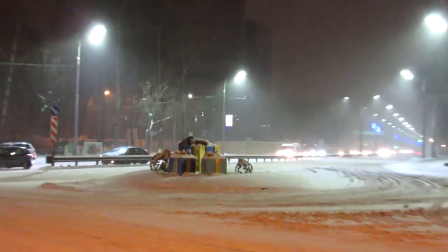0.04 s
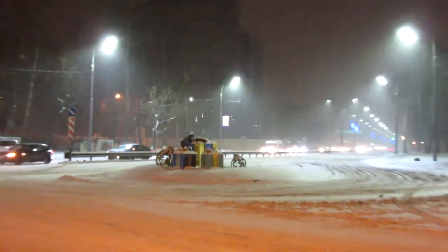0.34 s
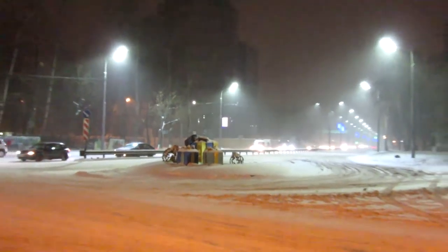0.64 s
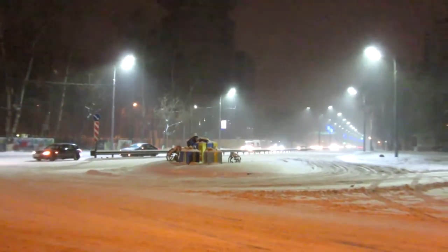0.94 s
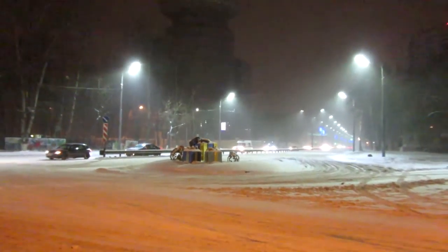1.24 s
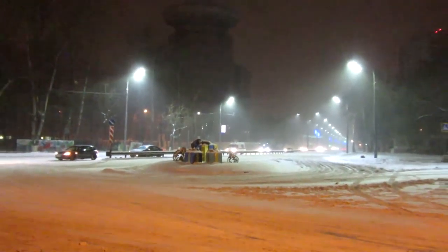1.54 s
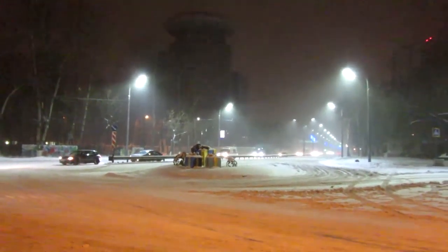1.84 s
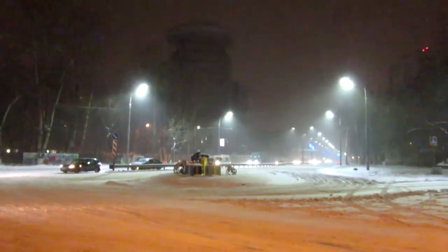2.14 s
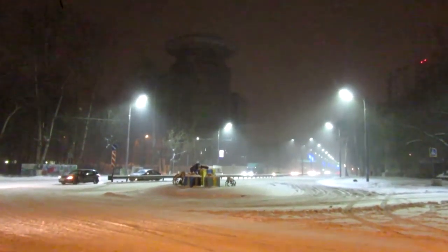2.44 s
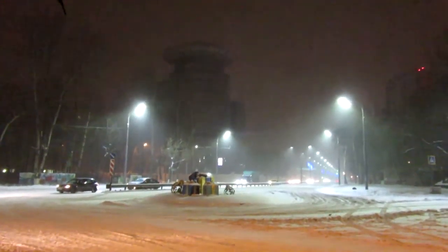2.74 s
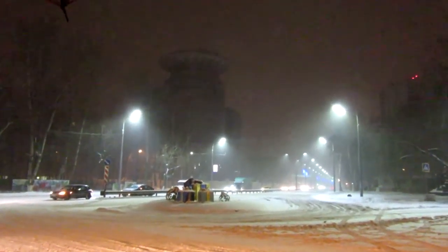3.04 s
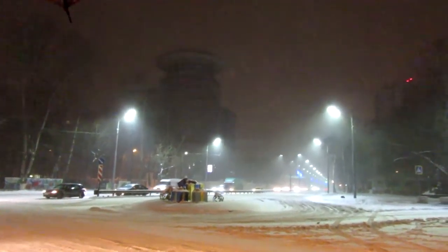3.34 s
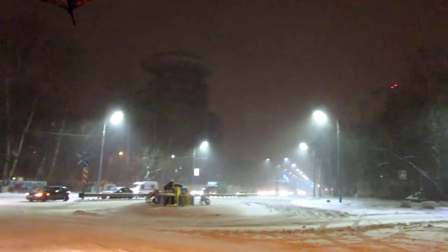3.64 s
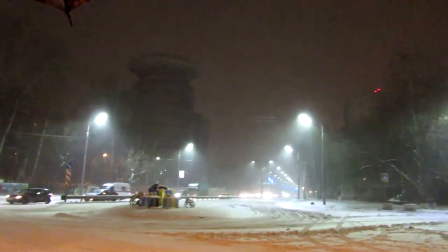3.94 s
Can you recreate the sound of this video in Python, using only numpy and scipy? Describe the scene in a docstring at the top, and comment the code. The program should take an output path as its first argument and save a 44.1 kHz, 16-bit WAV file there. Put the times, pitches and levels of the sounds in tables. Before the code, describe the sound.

Distant traffic rumbles throughout on a snowy street, with tyres on packed snow, an idling engine, light wind on the microphone and fine hiss. A nearer car passes from about 0.5 to 1.4 seconds. A faint high whine stops near 2.5 seconds. Fingers then click and tap on the camera until 3.8 seconds, hardest at 2.7 and 3.3, where the street dips slightly and slowly recovers.

```python
"""A snowy city street at night

Far traffic rumbles, tyres roll over packed snow, one car passes nearer and an engine idles.
Light wind buffets the microphone; a fine hiss and a thin high whine lie on top. Late on, fingers
click and tap on the camera's case. The two hardest clicks make the automatic volume control turn
everything down, and the street slowly comes back."""
import sys
import numpy as np
from scipy import signal
from scipy.io import wavfile

SR = 44100
rng = np.random.default_rng(int(sys.argv[2]) if len(sys.argv) > 2 else 0)


def digitize_waveform(pressure):
    """Quantize a signal to 16-bit integers and store it at the path in sys.argv[1].

    Rows of a 2-D input are taken as channels; values are limited to [-1, 1].
    """
    field = np.atleast_2d(pressure).T
    bounded = np.clip(field, -1, 1)
    quanta = np.round(bounded * 32767).astype(np.int16)
    wavfile.write(sys.argv[1], SR, quanta)


N = 176400
TIME = np.arange(N) / SR


def from_db(db):
    """Turn decibels into a number to multiply by."""
    return 10 ** (np.asarray(db) / 20)


def rms_one(x):
    """Scale a sound so that its average strength (rms) is 1."""
    return x / np.sqrt(np.mean(x ** 2) + 1e-20)


def level(rows):
    """Join (t/s, level/dB) points into a volume curve."""
    return from_db(np.interp(TIME, *np.transpose(rows)))


def drift(rate_hz):
    """A smooth random wander, about 1 in size; a higher rate wanders faster."""
    step, warm_up = 40, 2000
    pole = np.exp(-2 * np.pi * step * rate_hz / SR)
    noise = rng.standard_normal(N // step + warm_up + 2)
    slow = signal.lfilter([1], [1, -2 * pole, pole * pole], noise)[warm_up:]
    return np.interp(np.arange(N) / step, np.arange(len(slow)), rms_one(slow))


def band(x, low_hz, high_hz):
    """Keep the part of a sound between two frequencies."""
    return signal.sosfilt(signal.butter(2, [low_hz, high_hz], "band", fs=SR, output="sos"), x)


def coloured_noise(colour, flicker_db, flicker_hz):
    """Noise of strength 1 whose bands each flicker; the colour sets the balance of low and high."""
    hz, db = np.transpose(colour)
    edges = 18 * 2 ** (np.arange(31) / 3)   # three bands to an octave
    white, out = rng.standard_normal((2, N)), 0
    for k, (low, high) in enumerate(zip(edges, edges[1:])):
        centre, flicker = np.sqrt(low * high), drift(flicker_hz)
        if hz[0] / 2 < centre < hz[-1] * 2:
            band_filter = signal.butter(3, [low, high], "band", fs=SR, output="sos")
            band_db = np.interp(np.log(centre), np.log(hz), db) + flicker_db * flicker
            out = out + from_db(band_db) * signal.sosfilt(band_filter, white[k % 2])
    return rms_one(out)


def ring(t, hz, fade_s):
    """The tone of something struck: it dies away by 60 dB in fade_s."""
    return np.sin(2 * np.pi * hz * t) * from_db(-60 * t / fade_s)


def whine(hz=3985, width_hz=220, end_s=2.45, fade_s=0.06):
    """A narrow band of noise makes a thin, breathy whine that stops part way."""
    tone = rms_one(band(rng.standard_normal(N), hz - width_hz / 2, hz + width_hz / 2))
    return from_db(-67.5) * tone * np.clip((end_s - TIME) / fade_s, 0, 1)


# How loud the bright hiss and the softer hiss are: t/s, level/dB
BRIGHT_HISS_LEVEL = [(0, -56.5), (.45, -56.5), (.7, -57), (1.2, -55), (1.7, -53.5), (2.25, -56),
                     (2.65, -53), (3.25, -50), (3.6, -51.5), (4, -54)]
SOFT_HISS_LEVEL = [(0, -81), (2.4, -81), (3.0, -64.5), (3.7, -57.5), (4, -56)]
# Tone colour of the bright hiss: f/Hz, relative level/dB
BRIGHT_HISS_COLOUR = [(2600, -9), (3300, -34), (4100, -12), (5200, 6), (6500, 8), (8200, 6), (10400, 3),
                      (13000, -3.5), (15000, -5.5)]


def hiss(ticks_per_s=73, tick_decay_s=0.0015):
    """A bright hiss with tiny crackles, like blown snow; a softer, lower hiss grows near the end."""
    sizes = from_db(3.5 * np.minimum(rng.exponential(1, N), 4))
    kicks = sizes * (rng.random(N) < ticks_per_s / SR)
    tick_shapes = signal.lfilter([1], [1, -np.exp(-1 / (tick_decay_s * SR))], kicks + 1e-18)
    ticks = rms_one(band(tick_shapes * rng.standard_normal(N), low_hz=4700, high_hz=10600))
    bright = coloured_noise(BRIGHT_HISS_COLOUR, flicker_db=1.2, flicker_hz=10.3) + from_db(-3) * ticks
    soft = rms_one(band(rng.standard_normal(N), low_hz=2800, high_hz=4600))
    return level(BRIGHT_HISS_LEVEL) * bright + level(SOFT_HISS_LEVEL) * soft


# The tones in the engine's hum: multiple of the firing rate, level/dB
ENGINE_TONES = [(1, -43.5), (2, -50), (3, -52)]


def engine(firing_hz=86.4, wander=0.0199):
    """An idling engine fires so quickly that it hums, wavering in pitch and loudness."""
    phase = 2 * np.pi * np.cumsum(firing_hz * (1 + wander * drift(3.6))) / SR
    return sum(from_db(db + 0.83 * drift(2.2)) * np.sqrt(2) * np.sin(multiple * phase)
               for multiple, db in ENGINE_TONES)


# How loud the wind is: t/s, level/dB
WIND_LEVEL = [(0, -25.5), (.2, -36), (.33, -32.5), (.5, -40.5), (1.1, -35.5), (1.8, -42), (2.05, -35.5),
              (2.5, -37), (3.2, -31.5), (4, -37)]
# Its tone colour: f/Hz, relative level/dB
WIND_COLOUR = [(20, -36), (32, -4.5), (48, 13), (65, 1), (90, -8), (200, -25), (500, -91)]


def wind():
    """Air bumps against the microphone and makes a low, lumpy rumble."""
    return level(WIND_LEVEL) * coloured_noise(WIND_COLOUR, flicker_db=4.0, flicker_hz=14)


# How loud each part of the traffic is: t/s, level/dB
RUMBLE_LEVEL = [(0, -33.5), (.8, -34), (1.3, -32), (1.9, -32), (2.4, -32), (2.65, -31), (3.0, -29),
                (3.4, -27.5), (4, -30)]
TYRE_LEVEL = [(0, -40.5), (.45, -37), (.9, -35), (1.35, -36), (1.8, -34.5), (2.35, -36), (2.65, -35),
              (3.2, -35), (3.6, -36.5), (4, -35)]
SLUSH_LEVEL = [(0, -44.5), (1.2, -45.5), (1.45, -42.5), (1.9, -44), (2.35, -44), (2.65, -38.5), (2.95, -41),
               (3.3, -37), (4, -40.5)]
# The tone colour of each part: f/Hz, relative level/dB
RUMBLE_COLOUR = [(40, -9.5), (80, -0.5), (150, -1), (220, -4), (290, -3), (380, -12.5), (600, -18.5),
                 (1200, -35)]
TYRE_COLOUR = [(200, -18.5), (400, 1.5), (550, 5), (720, 5), (900, 4), (1080, -14), (1500, -14.5),
               (2500, -56)]
SLUSH_COLOUR = [(700, 1.5), (1100, 7), (1450, 3.5), (1900, -11.5), (2450, -9.5), (2900, -20.5), (3400, -37),
                (5000, -42)]


def traffic():
    """Far vehicles rumble while their tyres roar on the snow and swish through slush."""
    rumble = level(RUMBLE_LEVEL) * coloured_noise(RUMBLE_COLOUR, flicker_db=1.64, flicker_hz=2.1)
    tyres = level(TYRE_LEVEL) * coloured_noise(TYRE_COLOUR, flicker_db=2.22, flicker_hz=2.8)
    slush = level(SLUSH_LEVEL) * coloured_noise(SLUSH_COLOUR, flicker_db=1.8, flicker_hz=19)
    return rumble + tyres + slush


# Tone colour of the nearer car's tyres: f/Hz, relative level/dB
CAR_COLOUR = [(450, -15), (640, 4), (800, 3.5), (950, -6), (1200, -9), (1800, -44)]


def passing_car(start_s=0.45, rise_s=0.18, end_s=1.36, fall_s=0.26):
    """The tyre roar of one nearer car rises, holds and fades."""
    swell = np.clip(np.minimum((TIME - start_s) / rise_s, (end_s - TIME) / fall_s), 0, 1)
    return from_db(-37) * swell * coloured_noise(CAR_COLOUR, flicker_db=1.7, flicker_hz=7.6)


# The tones the camera's case rings with: f/Hz, relative level/dB, time to fade by 60 dB/s
CASE_TONES = [(1130, -0.5, 0.013), (1593, -1, 0.011), (1900, -7.5, 0.0076), (2187, -9, 0.012)]
# Finger clicks: t/s, level/dB, knock f/Hz, case ring level/dB, thump level/dB, crack level/dB
# (the last three are relative to the click's own level)
FINGER_CLICKS = [(2.5655, -20, 1450, -14, -25, -27), (2.609, -13.5, 445, -23, -7, -35),
                 (2.7475, 4, 800, -8.5, -39, -14.5), (3.3166, 3.5, 1350, -5.5, 2, -15),
                 (3.3754, -6.5, 614, -25, -14, -32), (3.3948, -4, 920, -28, -21, -41),
                 (3.4187, -5, 640, -18, -2, -31), (3.4823, -4, 620, -15, -14, -29),
                 (3.514, -7, 407, -9.5, -16, -32), (3.5780, -2.5, 493, -15, -25, -31),
                 (3.634, -7.5, 950, -3.5, -13, -6.5), (3.8033, -12, 480, -10.5, -27, -24)]


def finger_clicks(knock_cycles=4.67, crack_fade_s=0.0078, softness_hz=2370):
    """A finger hits the case: a short knock, a brief ring and a low thump, plus a bright crack."""
    out, t = np.zeros(N + SR), TIME[:SR // 20]
    case = sum(from_db(db) * ring(t, hz, fade_s) for hz, db, fade_s in CASE_TONES)
    thump = ring(t, hz=242, fade_s=0.0065)
    ping = ring(t, hz=5380, fade_s=0.0045)
    fingertip = signal.butter(4, softness_hz, fs=SR, output="sos")   # a soft touch dulls the highs
    for start_s, db, knock_hz, case_db, thump_db, crack_db in FINGER_CLICKS:
        knock = ring(t, knock_hz, knock_cycles / knock_hz)
        body = signal.sosfilt(fingertip, knock + from_db(case_db) * case + from_db(thump_db) * thump)
        burst = rng.standard_normal(len(t)) * from_db(-60 * t / crack_fade_s)
        crack = band(burst + ping, low_hz=3900, high_hz=12400)
        start = int(start_s * SR)
        out[start:start + len(t)] += from_db(db) * (from_db(crack_db) * crack - body)
    return out[:N]


def scene():
    """The street and the fingers on the camera, mixed into one channel."""
    return (traffic() + passing_car() + engine() + wind() + hiss() + whine() + finger_clicks())[None]


def record(dry, react_s=0.011, recover_db_per_s=5.5, cutoff_hz=15050):
    """The automatic volume control drops quickly on peaks above 0 dB and comes back slowly."""
    excess_db = np.maximum(20 * np.log10(np.abs(dry[0]) + 1e-9), 0)
    recovery_db = recover_db_per_s * TIME
    held_db = np.maximum.accumulate(excess_db + recovery_db) - recovery_db
    pole = np.exp(-1 / (react_s * SR))
    drop_db = signal.lfilter([1 - pole], [1, -pole], held_db)
    squashed = np.tanh(dry * from_db(-drop_db))   # peaks that slip through are rounded off
    treble_cut = signal.ellip(10, .1, 80, cutoff_hz, fs=SR, output="sos")
    return signal.sosfilt(treble_cut, squashed)


dry = scene()
out = record(dry)
digitize_waveform(out)
```